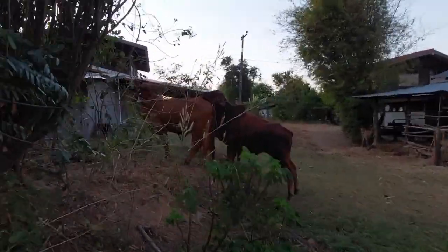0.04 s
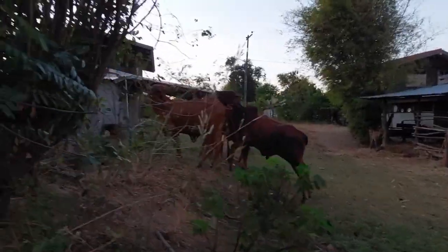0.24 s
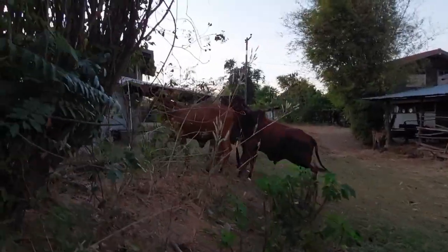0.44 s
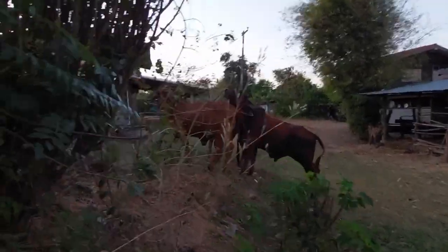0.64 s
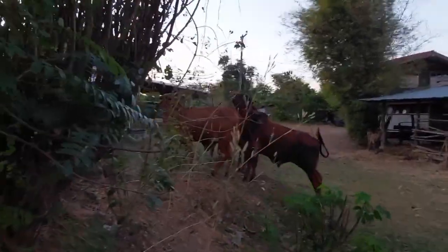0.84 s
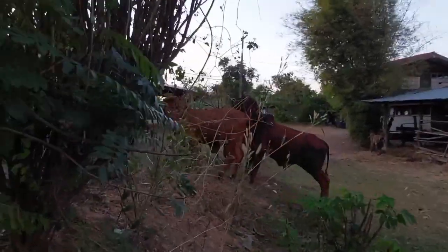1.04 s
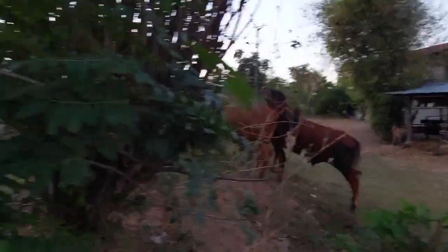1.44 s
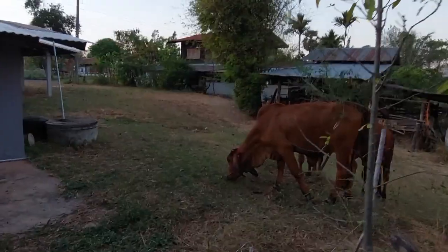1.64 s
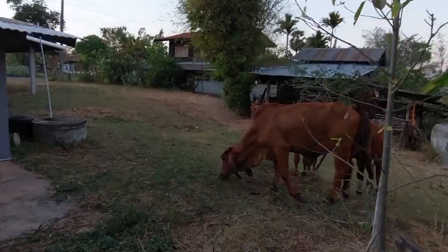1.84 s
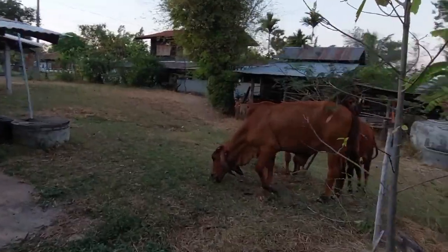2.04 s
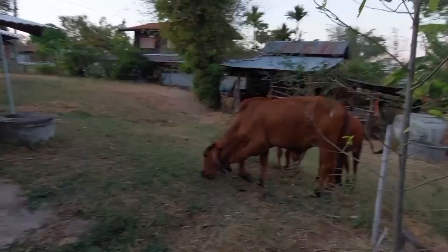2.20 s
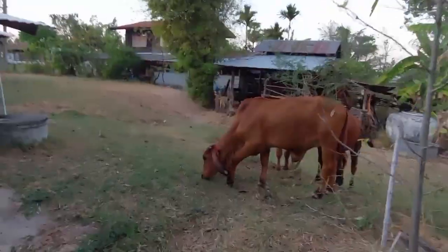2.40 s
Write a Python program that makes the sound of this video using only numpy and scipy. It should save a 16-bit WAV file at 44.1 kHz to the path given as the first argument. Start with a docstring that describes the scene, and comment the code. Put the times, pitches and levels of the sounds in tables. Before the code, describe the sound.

Someone walks through dry grass on a quiet pasture for about two and a half seconds, heard from one microphone. Blades swish and ground litter crunches in uneven strokes throughout. A small piece of metal rings thin and high as it is jostled, most clearly from 0.3 to 0.8 seconds and again near 1.5, then only faintly. Between 1.0 and 1.2 seconds, stalks snap underfoot in a crisp cluster, the loudest moment, with another crack near 1.4 and smaller ones afterward. The sound drops out for an instant just after 1.5 seconds. Birds give short, high chirps and gliding peeps that echo slightly off farm buildings, clearest around 0.2, 0.8 and 2.4 seconds. Underneath lie a steady hush of evening air, a soft hollow sound that swells and fades, and a very faint distant rumble that slowly grows toward the end.

```python
"""A small piece of metal rings on and off as it is jostled, and someone walks through dry grass.
On a cattle pasture, at one microphone: blades rub and swish, litter crunches, stalks snap underfoot.
Birds chirp among the farm buildings, echoing off walls and ground. Behind them lie still evening air,
a soft hollow sound and a faint, distant rumble. The sound drops out for a moment just past halfway."""
import sys
import numpy as np
from scipy import signal
from scipy.fft import rfft, irfft, next_fast_len
from scipy.io import wavfile
from scipy.ndimage import uniform_filter1d

SR = 44100
rng = np.random.default_rng(int(sys.argv[2]) if len(sys.argv) > 2 else 0)


def unload_audio(sound):
    """Save the sound as a 16-bit wav file, at the path given as the first command line argument."""
    columns = np.transpose(np.atleast_2d(sound))
    # keep every value between -1 and 1, then stretch to whole-number steps
    steps = np.round(np.clip(columns, -1, 1) * 32767)
    wavfile.write(sys.argv[1], SR, steps.astype(np.int16))


N = 108706
TIME = np.arange(N) / SR


# feet and legs in the grass: (peak time [s], relative hiss [dB], crunch [dB], length [factor])
STROKES = [(.1, -74, -63, 0.65), (.31, -55, -58, 1.8), (0.424, -49, -53, 0.64), (0.588, -59, -60, 3.3),
           (.7, -54.5, -75, 0.5), (0.824, -50, -62, 0.84), (1.052, -45, -51, 0.87),
           (1.143, -34.5, -48, 0.67), (1.42, -56, -58.5, 0.93), (1.49, -57.5, -62.5, 0.9),
           (1.595, -54, -73, 0.14), (1.78, -56.5, -61.5, 0.62), (1.888, -49, -60.5, 0.62),
           (1.963, -51.5, -57.5, 0.83), (2.081, -50.5, -59.5, 1.04), (2.295, -71, -63.5, 0.68),
           (2.372, -55, -74, 1.8), (2.445, -54.5, -57.5, 0.3)]
def strokes(rise_s=0.071, fall_s=0.094, rest_hiss_db=-65, rest_crunch_db=-77):
    """Strength of hiss and crunch: overlapping strokes add in power over a faint stirring."""
    hiss_power, crunch_power = gain_of(rest_hiss_db) ** 2, gain_of(rest_crunch_db) ** 2
    for s, hiss_db, crunch_db, length in STROKES:
        stroke = hump((TIME - s) / length, rise_s, fall_s, shape=1.1)
        hiss_power += (gain_of(hiss_db) * stroke) ** 2
        crunch_power += (gain_of(crunch_db) * stroke) ** 2
    return np.sqrt(hiss_power), np.sqrt(crunch_power)


def crackle(per_s, spread_db, click_share):
    """Tiny fractures of uneven size over the smooth noise of blades rubbing."""
    size = gain_of(spread_db * np.minimum(rng.exponential(1, N), 4))
    clicks = size * rng.choice([-1, 1], N) * (rng.random(N) < per_s / SR)
    return np.sqrt(click_share) * unit_rms(clicks) + np.sqrt(1 - click_share) * rng.standard_normal(N)


# blades, ground litter and dry tips at the microphone: (frequency [Hz], relative level [dB])
BLADE_SPECTRUM = [(1500, -35.5), (2600, -20), (3500, -19), (5200, -9.5), (6300, -5), (7000, -2.5),
                  (7600, 1.5), (8200, -5), (9200, -8), (11000, -26.5), (15800, -67)]
LITTER_SPECTRUM = [(250, -47), (500, -8.5), (750, -2.5), (1200, -0.5), (1900, -5), (2900, -7), (4500, 0),
                   (8000, -49)]
TIP_SPECTRUM = [(7000, -3), (9300, -5), (10400, 9.5), (11600, 4.5), (12800, 5), (15800, -2)]
def grass(blade_trim_db=-1, tip_trim_db=-14):
    """Brushed blades hiss and their tips fizz, in clumps; the litter below crunches more dully."""
    clumps = drift(29)
    blades = crackle(per_s=560, spread_db=4.5, click_share=0.23) * gain_of(2.15 * clumps)
    litter = crackle(per_s=600, spread_db=7.5, click_share=0.28) * gain_of(clumps)
    tips = crackle(per_s=900, spread_db=4, click_share=0.35) * gain_of(1.5 * clumps)
    hiss, crunch = strokes()
    return (gain_of(blade_trim_db) * hiss * unit_rms(colour(blades, BLADE_SPECTRUM))
            + crunch * unit_rms(colour(litter, LITTER_SPECTRUM))
            + gain_of(tip_trim_db) * hiss * unit_rms(colour(tips, TIP_SPECTRUM)))


# the burst of a breaking stalk: (frequency [Hz], relative level [dB])
STALK_SPECTRUM = [(500, -13.5), (1200, -30), (3000, -19.5), (5000, -23), (5700, -12), (6300, -14.5),
                  (7000, -3.5), (7600, 1.5), (8200, -8.5), (9000, -21.5), (10500, -21.5), (11700, -31),
                  (12800, -28), (15800, -41)]
# stalks underfoot, levels before each band's trim:
# (time [s], stem ring [Hz], woody band [dB], crisp band [dB], top band [dB], decay [s])
STALK_SNAPS = [(.979, 850, -52, -65, -74, .0011), (1.0264, 3180, -41.5, -39, -67, .003),
               (1.113, 3250, -39, -13, -37, 0.0017), (1.1219, 1120, -42, -25, -50, 0.0013),
               (1.1412, 3230, -58, -23, -27.5, 0.0087), (1.1444, 3180, -41.5, -9.5, -21.5, 0.0011),
               (1.1515, 1310, -45.5, -19.5, -34.5, .007), (1.161, 1330, -41, -18, -23, 0.0022),
               (1.3685, 2660, -35, -30.5, -46.5, 0.0018), (1.3828, 1260, -45, -42, -51, 0.0014),
               (1.5623, 1230, -61.5, -41.5, -60, 0.0053), (1.6375, 1240, -53, -40, -63, 0.0009),
               (1.7075, 3150, -64, -46, -77, 0.0008), (1.756, 2520, -71, -35.5, -50, 0.00056),
               (1.851, 3320, -57, -48, -47.5, 0.0019), (1.969, 1200, -47.5, -53, -76, 0.0028),
               (2.0735, 1630, -59, -48, -55, .0033), (2.271, 1160, -50, -45.5, -61, 0.00054),
               (2.436, 2220, -65, -47, -50.5, 0.001)]
def snaps(give_s=0.003, give_db=-25, crack_s=0.0021, splinter_db=-27.5, splinter_s=0.033):
    """Each stalk gives, breaks with a sharp burst that rings its woody stem, then splinters."""
    woody_trim_db, crisp_trim_db, top_trim_db = -1.5, -3, 3
    out = np.zeros(N)
    t = np.arange(3072) / SR - give_s
    first_crack = (t >= 0) & (t < crack_s)  # the band levels hold for this span
    for s, ring_hz, woody_db, crisp_db, top_db, decay_s in STALK_SNAPS:
        splinters = gain_of(splinter_db) * np.exp(-abs(t) / splinter_s)
        envelope = np.where(t < 0, gain_of(give_db), np.exp(-abs(t) / decay_s) + splinters)
        burst = colour(rng.choice([-1, 1], len(t)) * envelope, STALK_SPECTRUM)
        knock = band(burst, 622, 5400)
        ring = signal.lfilter(*signal.iirpeak(ring_hz, Q=7, fs=SR), knock)
        stem = 0.92 * unit_rms(ring) + 0.08 * unit_rms(knock)
        parts = [(woody_db + woody_trim_db, stem),
                 (crisp_db + crisp_trim_db, band(burst, 4500, 9770)),
                 (top_db + top_trim_db, band(burst, 10350, 18200))]
        for db, part in parts:
            add(out, s - give_s, gain_of(db) * part / np.std(part[first_crack]))
    return out


# the metal is jostled: (peak time [s], low mode [dB], middle mode [dB], rise [s], fall [s])
JOSTLES = [(.005, -73, -49.5, 0.0078, 0.03), (0.065, -46, -65, 0.049, .03),
           (0.122, -52.5, -54.5, 0.015, 0.029), (0.301, -53.5, -49, 0.042, 0.032),
           (.388, -40, -51, 0.005, 0.0078), (0.407, -50, -39.5, 0.015, 0.018),
           (.439, -31.5, -57, 0.02, 0.021), (0.484, -38.5, -60.5, 0.021, 0.017),
           (0.551, -40.5, -47, 0.015, 0.017), (.59, -53.5, -66, 0.012, 0.051),
           (.725, -50.5, -53, 0.036, 0.0094), (0.755, -54, -37.5, 0.012, 0.033),
           (1.026, -48.5, -49.5, 0.012, 0.036), (1.081, -48.5, -49, 0.023, .03),
           (1.212, -52, -48, 0.0098, 0.02), (1.4, -61, -63, 0.051, 0.075),
           (1.471, -33, -39.5, 0.0073, 0.017), (1.511, -43.5, -47, 0.036, 0.0092),
           (1.65, -61.5, -72, 0.018, 0.053), (1.911, -53, -78, .011, 0.025), (1.99, -65, -80, 0.037, .05),
           (2.325, -68, -59, .012, 0.018)]
def metal(modes_hz=(4178, 9108, 15400), waver_hz=10, ring_db=-19, ring_s=0.04):
    """Three thin modes swell as the metal is jostled, rasp where it rubs and ring away."""
    high_db, rasp_db, grit_db = -30, -20, -27
    low, middle, high = (sine(hz + waver_hz * drift(33.7)) for hz in modes_hz)
    low_power, middle_power = np.zeros((2, N))
    for s, low_db, middle_db, rise_s, fall_s in JOSTLES:
        t = TIME - s
        tail = (t > 0) * gain_of(ring_db) * np.exp(-abs(t) / ring_s)
        swell = np.maximum(hump(t, rise_s, fall_s, shape=1.87), tail)
        low_power += (gain_of(low_db) * swell) ** 2
        middle_power += (gain_of(middle_db) * swell) ** 2
    ringing = low * np.sqrt(low_power) + (middle + gain_of(high_db) * high) * np.sqrt(middle_power)
    rubbing = gain_of(rasp_db) * drift(440) + gain_of(grit_db) * drift(1500)
    flutter = gain_of(drift(50))  # 1 dB rms
    return ringing * flutter * (1 + rubbing)


# off walls and ground to the microphone: (delay [s], level against the direct sound [dB])
YARD_ECHOES = [(.012, -3), (.021, -16.5), (.033, -32)]
def whistle(hz, envelope, scatter_db, waver=0.032, scatter_s=0.06):
    """A bird's slightly raspy note with its echoes, which overlap it and make it flutter."""
    tone = envelope * sine(hz * (1 + waver * drift(298, size=len(hz))))
    t = TIME[:SR // 4]
    yard = rng.standard_normal(len(t)) * np.exp(-t / scatter_s) * (t > 0.004)
    yard *= gain_of(scatter_db) / np.linalg.norm(yard)
    yard[0] = 1  # the direct sound
    for delay_s, db in YARD_ECHOES:
        add(yard, delay_s, gain_of([db]))
    return signal.fftconvolve(tone, yard)


# the arch that each chirp scales: (time from about its peak [s], pitch [Hz], relative level [dB])
CHIRP_ARCH = [(-.085, 2900, -22), (-.06, 3400, -24), (-.046, 4300, -9), (-.03, 5250, -8.5),
              (-.014, 5200, -2.5), (-.004, 4800, 2.5), (.006, 4550, 1.5), (0.018, 4300, -19),
              (.022, 4200, -37)]
# birds among the buildings: (time [s], level [dB], pitch [factor], length [factor], scatter [dB])
YARD_CHIRPS = [(0.238, -46.5, 0.96, .6, 0.5), (.838, -43.5, 0.99, 1, -4), (1.439, -56.5, .95, 0.39, 4),
               (1.721, -53.5, .97, 0.63, -16), (2.199, -62, .95, 0.22, -23), (2.412, -36, 0.98, 0.79, -12)]
# their short gliding notes: (time [s], level [dB], start pitch [Hz], end pitch [Hz])
YARD_PEEPS = [(0.244, -52.5, 3510, 4085), (.318, -60, 2700, 3190), (.363, -60, 2810, 3720),
              (.648, -59, 2910, 3480), (0.741, -53, 5760, 4920), (.76, -62.5, 2790, 3290),
              (0.798, -51.5, 3340, 3940), (1.289, -63.5, 3400, 3650), (1.621, -64.5, 5040, 5640),
              (1.725, -65, 3150, 3845), (2.301, -57.5, 4130, 5630), (2.332, -58, 2900, 3580)]
def birds(peep_s=0.048, peep_scatter_db=-5):
    """Birds whistle chirps that arch up and down, and fainter notes that glide one way."""
    out, t = np.zeros(N), TIME[:SR // 5]
    arch_s, arch_hz, arch_db = np.transpose(CHIRP_ARCH)
    for s, db, pitch, length, scatter_db in YARD_CHIRPS:
        along_s = arch_s[0] + t / length
        hz = pitch * np.interp(along_s, arch_s, arch_hz)
        envelope = gain_of(db + np.interp(along_s, arch_s, arch_db)) * (along_s < arch_s[-1])
        add(out, s + arch_s[0] * length, whistle(hz, envelope, scatter_db))
    progress = np.minimum(t / peep_s, 1)
    for s, db, start_hz, end_hz in YARD_PEEPS:
        hz = start_hz + (end_hz - start_hz) * progress
        add(out, s, whistle(hz, gain_of(db) * np.sin(np.pi * progress), peep_scatter_db))
    return out


# the air around the microphone: (frequency [Hz], relative level [dB])
AIR_SPECTRUM = [(100, -19.5), (160, -2), (240, -9), (600, -10), (2700, -11), (4500, -4),
                (7500, -11), (10000, -13.5), (15800, -34)]
def still_air(level_db=-64.5):
    """The steady, broad hush of evening air."""
    return gain_of(level_db) * noise(AIR_SPECTRUM)


# a hollow sound in the background: (frequency [Hz], relative level [dB])
HOLLOW_SPECTRUM = [(120, -32), (280, -6), (440, -0.5), (650, -6.5), (1300, -27.5), (4000, -72)]
# its swells: (peak time [s], level [dB])
HOLLOW_SWELLS = [(0.091, -67.5), (.63, -66.5), (1.119, -80), (1.46, -65.5), (2.45, -72)]
def hollow_sound(rise_s=0.08, fall_s=0.092, rest_db=-74.5):
    """Soft noise around 440 Hz comes and goes in rounded swells."""
    swells = sum(gain_of(db) * hump(TIME - s, rise_s, fall_s, shape=2.4) for s, db in HOLLOW_SWELLS)
    return (gain_of(rest_db) + swells) * noise(HOLLOW_SPECTRUM)


# a rumble far from the microphone: (frequency [Hz], relative level [dB])
RUMBLE_SPECTRUM = [(25, -50), (42, -35), (58, -1.5), (80, 3), (130, 6), (175, -3), (230, -16), (400, -22)]
# its rise and fall: (time [s], level [dB])
RUMBLE_LEVELS = [(0, -83), (.7, -74.5), (1.3, -78.5), (1.6, -74), (2.0, -72.5), (2.46, -69)]
def distant_rumble(drone_hz=59, waver_hz=1.26, drone_db=-4.5):
    """Low noise with a faint wavering drone in it, slowly and unevenly growing."""
    rumble = noise(RUMBLE_SPECTRUM)
    drone = gain_of(drone_db) * sine(drone_hz + waver_hz * drift(3.6))
    level_db = np.interp(TIME, *np.transpose(RUMBLE_LEVELS))
    return gain_of(level_db) * (rumble + drone)


def gain_of(db):
    """Decibels to amplitude."""
    return 10 ** (np.asarray(db) / 20)


def unit_rms(x):
    """Scales to rms 1."""
    return x / np.sqrt(np.mean(x ** 2) + 1e-20)


def sine(hz):
    """A tone of rms 1 that follows a pitch curve."""
    return np.sqrt(2) * np.sin(2 * np.pi * np.cumsum(hz) / SR)


def noise(spectrum):
    """Coloured noise of rms 1."""
    return unit_rms(colour(rng.standard_normal(N), spectrum))


def colour(x, spectrum):
    """Gives x a spectrum at minimum phase, so each click rings only after it lands."""
    size = next_fast_len(len(x) + 4096) * 2
    points_hz, points_db = np.transpose(spectrum)
    hz = abs(np.fft.fftfreq(size, 1 / SR))
    db = np.interp(np.log(hz + 1), np.log(points_hz + 1), points_db)
    log_gain = np.log(gain_of(np.maximum(db, -90)))
    response = np.exp(np.conj(signal.hilbert(log_gain)))[:size // 2 + 1]
    return irfft(rfft(x, size) * response, size)[:len(x)]


def band(x, low_hz, high_hz):
    """Band-pass."""
    return signal.sosfilt(signal.butter(3, [low_hz, high_hz], "band", fs=SR, output="sos"), x)


def drift(cutoff_hz, size=N):
    """Random wander of rms 1."""
    full = next_fast_len(size, real=True)
    lowpass = 1 / (1 + (np.fft.rfftfreq(full, 1 / SR) / cutoff_hz) ** 4)
    return unit_rms(irfft(rfft(rng.standard_normal(full)) * lowpass, full)[:size])


def hump(t, rise_s, fall_s, shape):
    """Envelope that peaks at t = 0: pointed for shape 1, rounded for shape 2."""
    return np.exp(-np.minimum(abs(t / np.where(t < 0, rise_s, fall_s)) ** shape, 20))


def add(mix, s, sound):
    """Mixes a sound in at time s."""
    part = mix[max(round(s * SR), 0):][:len(sound)]
    part += sound[:len(part)]


def scene():
    """The pasture at one microphone, from the walker to the far rumble."""
    return (grass() + snaps() + metal() + birds() + still_air() + hollow_sound() + distant_rumble())[None]


def record(dry):
    """The sound drops out briefly, and the highest treble is cut off."""
    dropout_start_s, dropout_end_s, cutoff_hz = 1.519, 1.5615, 15900
    audible = (TIME < dropout_start_s) | (TIME > dropout_end_s)
    gate = uniform_filter1d(audible.astype(float), size=40)
    lowpass = signal.firwin(511, cutoff_hz, window=("kaiser", 9), fs=SR)
    return signal.oaconvolve(dry * gate, lowpass[None], "same")


dry = scene()
out = record(dry)
unload_audio(out)
```